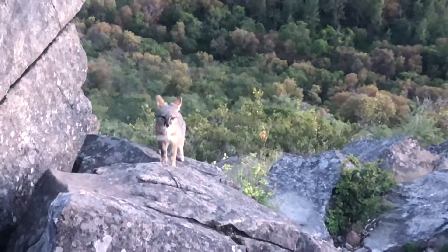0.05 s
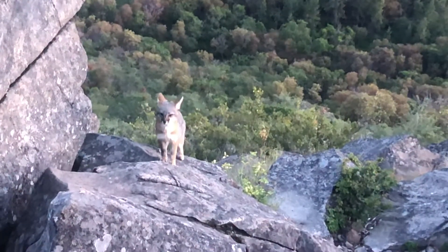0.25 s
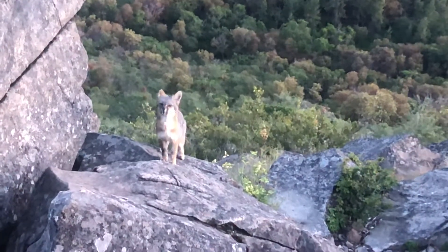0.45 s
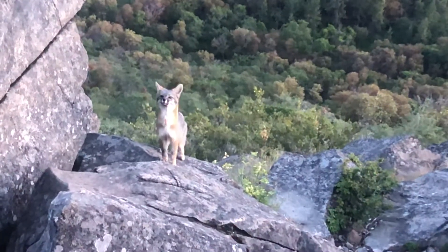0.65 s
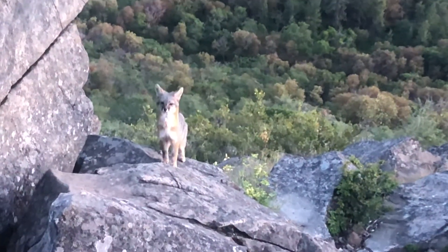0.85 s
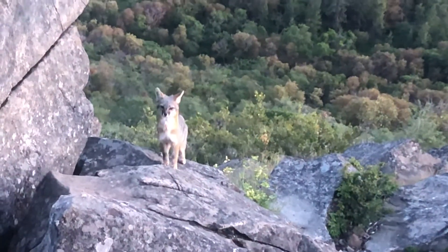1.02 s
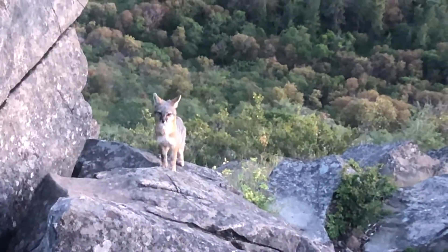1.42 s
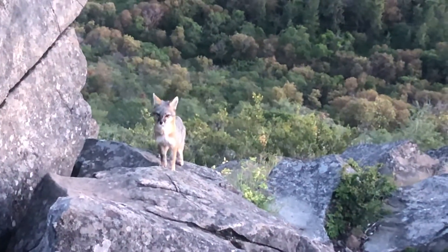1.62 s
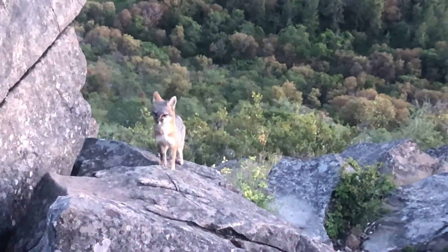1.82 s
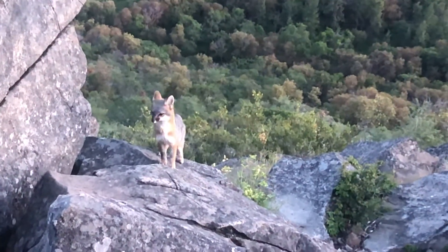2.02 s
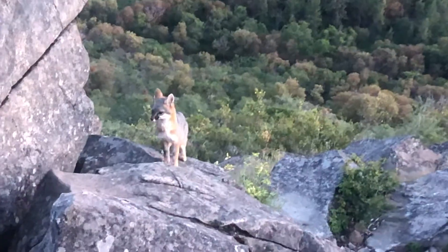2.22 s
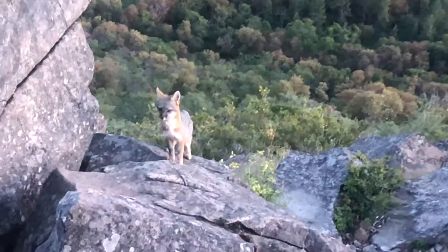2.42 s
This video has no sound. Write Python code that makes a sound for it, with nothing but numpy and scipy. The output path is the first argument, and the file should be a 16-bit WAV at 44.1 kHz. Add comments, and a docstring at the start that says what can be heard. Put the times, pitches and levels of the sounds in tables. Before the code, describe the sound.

A grey fox gives one loud cry nearby, a clear arching tone that turns hoarse as it falls. Faint chirring, a cricket and thin bird whistles follow from far down a wooded hillside, over a low rumble of air.

```python
"""Over a low rumble of air and a thin hiss of leaves, a grey fox on a boulder gives one cry.
Its throat catches, then its vocal folds sing a clear, arching tone that turns hoarse as it falls.
Far down the wooded hillside insects and birds follow, echoing off the trees: chirring notes,
a pulsing cricket, then thin whistles. Towards the end a few faint, dry ticks sound close by."""
import sys
import numpy as np
from scipy import signal
from scipy.fft import rfft, irfft
from scipy.io import wavfile
from scipy.ndimage import uniform_filter1d

SR = 44100
rng = np.random.default_rng(int(sys.argv[2]) if len(sys.argv) > 2 else 0)


def transcribe(u):
    """Save the signal u as a 16-bit wav file named by the first command-line argument.

    u: samples, shape (n,) or (channels, n), limited to [-1, 1]; the rate is SR.
    q: integer samples, one column per channel.
    """
    v = np.clip(np.atleast_2d(u).T, -1, 1)
    q = np.round(v * 32767).astype(np.int16)
    wavfile.write(sys.argv[1], SR, q)


N = 112454
TIME = np.arange(N) / SR


def from_db(db):
    """Decibels to gain."""
    return 10 ** (np.asarray(db) / 20)


def rms_one(x):
    """Scale to unit rms."""
    return x / np.sqrt(np.mean(x ** 2) + 1e-20)


def in_time(rows):
    """Breakpoints to envelopes, one for each column after the time."""
    times, *columns = np.transpose(rows)
    return [np.interp(TIME, times, column) for column in columns]


def gain_at(points, hz):
    """Gain of an EQ curve at given frequencies, falling 24 dB an octave beyond its ends."""
    point_hz, db = np.transpose(points)
    octave, point_octaves = np.log2(np.maximum(hz, 1)), np.log2(point_hz)
    beyond = np.abs(octave - np.clip(octave, point_octaves[0], point_octaves[-1]))
    return from_db(np.interp(octave, point_octaves, db) - 24 * beyond)


def noise(colour):
    """Noise shaped by an EQ curve, rms 1."""
    hz = np.arange(N // 2 + 1) * SR / N
    return rms_one(irfft(rfft(rng.standard_normal(N)) * gain_at(colour, hz), N))


def drift(hz):
    """Random modulation up to a given speed, rms 1."""
    return rms_one(signal.sosfilt(signal.butter(2, hz, fs=SR, output="sos"), rng.standard_normal(N)))


def decay(start, t60):
    """A hard attack that dies away by 60 dB in t60 seconds."""
    return (TIME >= start) * from_db(-60 * np.maximum(TIME - start, 0) / t60)


def scatter(x, t60, echo_db):
    """A sound with its diffuse echoes from trees or rocks."""
    tail = rng.standard_normal(N) * decay(0, t60)
    return x + from_db(echo_db) * signal.fftconvolve(x, tail / np.linalg.norm(tail))[:N]


def air():
    """The steady bed: the valley rumbles under a hiss of far insects and leaves."""
    # colours of the rumble and the hiss: (frequency [Hz], relative level [dB])
    rumble_colour = [(15, -38.5), (25, -19), (54, -0.5), (125, 1.5), (281, -1), (338, -7.5), (383, -7.5),
                     (656, -4.5), (774, -12.5), (858, -12.5), (1920, -27), (3220, -34), (3500, -34),
                     (4550, -57.5), (7700, -120)]
    hiss_colour = [(2000, -9.5), (3000, -22), (3800, -5.5), (4350, 2.5), (4800, -12.5), (6000, -15),
                   (9000, -19), (15500, -20.5)]
    return from_db(-58) * noise(rumble_colour) + from_db(-74) * noise(hiss_colour)


def fox_partials(pitch, phase):
    """Three strong low partials; overtones slide through peaks and notches and glance off the rocks."""
    # envelopes of the low partials, the third the piercing one: (time [s], rms level [dB])
    fundamental = [(.145, -41), (.2, -36), (.265, -33.5), (.298, -22), (.36, -29.5), (.45, -26.5),
                   (.56, -21), (.625, -27.5), (.645, -39), (.66, -29), (.673, -41), (.71, -35.5),
                   (.755, -42), (.79, -96)]
    second = [(.145, -43), (.2, -40), (.31, -38), (0.347, -32), (0.361, -47), (0.383, -25), (.42, -18),
              (.49, -15.5), (.555, -21.5), (0.587, -38.5), (.62, -32.5), (.685, -42), (.71, -52.5)]
    third = [(.145, -36), (.162, -33), (.183, -28), (.192, -26), (.205, -23.5), (.27, -21.5), (.295, -20.5),
             (.313, -18), (.322, -25), (.333, -17), (.352, -36), (.372, -41), (.384, -20), (.41, -16.5),
             (.566, -16.5), (.582, -57), (.597, -20), (.62, -13), (.64, -27), (.678, -32), (.705, -62)]
    # vocal effort, heard in the higher overtones: (time [s], gain [dB])
    effort_curve = [(.145, -28), (.165, -18.5), (.195, -9.5), (.27, -4), (.33, 0.5), (.39, 1.5), (.45, 2.5),
                    (.51, 4), (.56, -2), (.585, 0.3), (.618, -2.5), (.645, -14), (.685, -26), (.71, -52)]
    # peaks of the voice, with narrow notches from reflection off the rock:
    # (frequency [Hz], rms level at 0 dB effort [dB])
    overtone_colour = [(3200, -16.5), (3760, -50), (3970, -32), (4180, -30.5), (4250, -39), (4600, -23.5),
                       (4880, -28.5), (5300, -22.5), (5370, -44), (5510, -30.5), (5720, -49.5),
                       (6000, -34.0), (6210, -34.5), (6350, -46.5), (7050, -31.5), (7190, -37), (7470, -35),
                       (7680, -30.5), (8030, -35.5), (8240, -29), (8380, -30), (8870, -40), (8940, -34),
                       (9290, -26.5), (9430, -27.5), (9710, -35.5), (9920, -36), (10130, -47),
                       (10340, -39.5), (10480, -40), (10760, -34.0), (11460, -48.5), (11600, -37.5),
                       (11670, -50.5), (12370, -44), (12650, -58), (12790, -45.5), (13210, -55.5),
                       (13420, -48), (14820, -59.5), (15170, -49), (15730, -54.5)]
    glide_s, smear_rad = .005, 0.32
    waver_db, flicker_db = 1.3, 1.03  # depths at 10 kHz; higher partials wobble more
    effort = from_db(in_time(effort_curve)[0])
    gains = [uniform_filter1d(from_db(in_time(curve)[0]), size=int(glide_s * SR))
             for curve in (fundamental, second, third)]
    gains += [effort * gain_at(overtone_colour, k * pitch) for k in range(4, 21)]
    waves = []
    for k, gain in enumerate(gains, 1):
        height = k * pitch / 10000
        wobble_db = height * (waver_db * drift(hz=21.77) + flicker_db * drift(hz=101))
        lag = smear_rad * k ** 2  # the throat smears each pulse
        waves.append(gain * from_db(wobble_db) * np.sin(k * phase - lag))
    overtones = scatter(sum(waves[3:]), t60=0.077, echo_db=-19.5)
    return np.sqrt(2) * (sum(waves[:3]) + overtones)


def fox():
    """One arching tone; the vocal folds grow unsteady, and a growl and a pulsing rasp join in."""
    # arch of the cry: (time [s], pitch [Hz])
    arch = [(.143, 787), (.16, 847), (.183, 922), (.2, 937), (.235, 940.5), (.265, 943), (.3, 957),
            (.35, 985), (.4, 1019), (.45, 1043), (.48, 1052), (.5, 1052.5), (.53, 1043), (.57, 1011),
            (.6, 967), (.63, 904), (.66, 819), (.69, 738), (.72, 618), (.75, 548), (.78, 520)]
    # hoarseness: (time [s], growl level [dB], rasp level [dB], unsteadiness [share of the pitch])
    hoarseness = [(.145, -73, -60, 0.0024), (.2, -95, -91, 0.000093), (.32, -78, -72, .0002),
                  (.385, -51, -68, .0003), (.428, -36.5, -62, 0.00035), (.448, -34, -52, 0.0004),
                  (.49, -30, -42.5, 0.00063), (.58, -31, -42, .002), (.65, -32, -40.5, 0.0066),
                  (.683, -34, -48, 0.0077), (.71, -37.5, -46, 0.016), (.755, -44.5, -55.5, 0.031),
                  (.8, -54, -57, 0.036)]
    # treble sizzle as the hard-driven folds lose their grip: (time [s], level [dB])
    sizzle_curve = [(.15, -62), (.2, -90), (.44, -78), (.53, -57.5), (.585, -47.5), (.625, -47.5),
                    (.675, -62.5), (.72, -71), (.78, -88.5)]
    # colours of the voice's four noise layers: (frequency [Hz], relative level [dB])
    catch_colour = [(500, -17), (740, 7), (1100, -5.5), (2500, -8), (3200, 2.5), (3900, -39), (5000, -10),
                    (8300, -20), (12000, -39), (15000, -14)]
    growl_colour = [(130, -38), (215, -21), (330, -36), (450, -29.5), (550, -9.5), (640, -6.5), (695, 0.5),
                    (765, -7), (850, -9), (1150, -16), (1300, -20), (1400, -7.5), (1500, -8.5),
                    (1570, -19.5), (1720, -32)]
    rasp_colour = [(1700, -3), (1950, 7.5), (2250, -6.5), (2800, 7), (3600, 0.5), (4150, -7.5), (4700, -23),
                   (5350, 3.5), (5750, -6), (6100, -0.5), (6750, -20), (7450, -6), (8400, -21.5),
                   (10000, -26.5), (15500, -36)]
    sizzle_colour = [(6500, -10), (7900, 0.5), (8800, -13), (9400, -3), (11000, -9.5), (12800, -19),
                     (13600, -6.5), (14700, -16.5), (15500, -6)]
    onset_s, attack_s, end_s, release_s = 0.1412, 0.0044, 0.7945, 0.035
    flutter_hz, shimmer, pulse_depth = 164, 12, 0.78
    growl_db, rasp_db, unsteady = in_time(hoarseness)
    pitch = uniform_filter1d(in_time(arch)[0], size=700)
    jitter = 1 + unsteady * drift(flutter_hz)
    phase = 2 * np.pi * np.cumsum(pitch * jitter) / SR
    tremble = 1 + shimmer * unsteady * drift(flutter_hz)
    tone = tremble * fox_partials(pitch, phase)
    growl = from_db(growl_db) * noise(growl_colour)
    fold_pulses = 1 + pulse_depth * np.cos(phase)
    rasp = from_db(rasp_db) * noise(rasp_colour) * fold_pulses
    sizzle = from_db(in_time(sizzle_curve)[0]) * noise(sizzle_colour)
    catch = from_db(-30) * decay(onset_s, t60=0.043) * noise(catch_colour)  # the throat catches
    gate = np.clip((TIME - onset_s) / attack_s, 0, 1) * np.clip((end_s - TIME) / release_s, 0, 1)
    return gate * (tone + growl + rasp + sizzle + catch)


def chirring():
    """Runs of short wavering notes, each arching downwards."""
    # each note at its loudest: (time [s], rms level [dB], pitch [Hz])
    notes = [(.918, -63, 4414), (.962, -61, 4400), (1.02, -65.5, 4465), (1.073, -68.5, 4380),
             (1.296, -62.5, 4333), (1.35, -63, 4347), (1.474, -68.5, 4340), (1.533, -70, 4320),
             (1.738, -63, 4410), (1.794, -61.5, 4464), (1.87, -68.5, 4360), (1.93, -71, 4335),
             (2.23, -70, 4315), (2.292, -67, 4200), (2.342, -63.5, 4400), (2.396, -65.5, 4390)]
    width_s, sag_hz_per_s, arch_hz, waver_hz = .01, 7500, 54, 85
    out = np.zeros(N)
    for centre, db, hz in notes:
        offset = TIME - centre
        bend = (offset / width_s) ** 2
        pitch = hz - sag_hz_per_s * offset - arch_hz * bend + waver_hz * drift(hz=435)
        out += from_db(db) * np.exp(-.5 * bend) * np.sin(2 * np.pi * np.cumsum(pitch) / SR)
    return np.sqrt(2) * out


def cricket():
    """A cricket holds one slightly rough pitch, swelling three times in each chirp."""
    # crest of each chirp's first pulse: (time [s], rms level [dB])
    chirps = [(.92, -69.5), (1.317, -67.5), (1.677, -67), (2.037, -67), (2.405, -68)]
    pitch_hz, waver_hz, spacing_s, width_s = 4650, 96, 0.051, 0.013
    swell = sum(from_db(db) * np.exp(-.5 * ((TIME - first - k * spacing_s) / width_s) ** 2)
                for first, db in chirps for k in range(3))
    pitch = pitch_hz + waver_hz * drift(hz=430)
    return np.sqrt(2) * swell * np.sin(2 * np.pi * np.cumsum(pitch) / SR)


def whistles():
    """Thin bird notes that glide and settle, some clear, some buzzy."""
    # (time [s], length [s], start pitch [Hz], end pitch [Hz], peak level [dB], waver depth [Hz])
    bird_notes = [(1.401, 0.044, 4700, 5520, -74.5, 169.9), (1.543, 0.026, 4600, 5370, -71, 190),
                  (1.662, .035, 4745, 5900, -75, 169.3), (1.799, .125, 7000, 6020, -76, 39.94),
                  (2.05, 0.068, 4970, 5485, -76, 203), (2.28, 0.064, 5000, 5400, -77, 170),
                  (2.421, .13, 5310, 5170, -75, 244)]
    out = np.zeros(N)
    for start, length, start_hz, end_hz, db, waver_hz in bird_notes:
        progress = np.clip((TIME - start) / length, 0, 1)
        pitch = end_hz + (start_hz - end_hz) * (1 - progress) ** 3 + waver_hz * drift(hz=300)
        out += from_db(db) * np.sin(np.pi * progress) * np.sin(2 * np.pi * np.cumsum(pitch) / SR)
    return out


def ticks():
    """Small dry contacts close by that die at once; the softest are the dullest."""
    # contacts: (time [s], level before the low-pass [dB], low-pass cutoff [Hz])
    contacts = [(1.732, -53.5, 2200), (1.791, -51, 2400), (2.1366, -47.5, 6000), (2.1434, -41.5, 6000),
                (2.1585, -49, 9900)]
    # colour of a contact: (frequency [Hz], relative level [dB])
    tick_colour = [(500, -7), (950, 9), (1400, 4.5), (1850, -2), (2400, 2), (2800, -3), (3250, 10.5),
                   (4200, -18), (9000, -12), (14000, -29.5)]
    out = np.zeros(N)
    for start, db, cutoff_hz in contacts:
        burst = from_db(db) * decay(start, t60=.012) * noise(tick_colour)
        low_pass = signal.butter(2, cutoff_hz, fs=SR, output="sos")
        out += signal.sosfilt(low_pass, burst + 1e-18)
    return out


def scene():
    """Mono mix: fox and ticks in front; air and the hillside's insects and birds behind."""
    bed = air()
    hillside = scatter(cricket() + chirring() + whistles(), t60=0.18, echo_db=-4.5)
    return (bed + fox() + hillside + ticks())[None]


def record(dry):
    """A faint white hiss joins the mix, and the top is cut steeply."""
    hiss_db, cutoff_hz = -84, 15750
    hiss = from_db(hiss_db) * rng.standard_normal(N)
    return signal.sosfilt(signal.ellip(12, .1, 80, cutoff_hz, fs=SR, output="sos"), dry + hiss)


dry = scene()
out = record(dry)
transcribe(out)
```